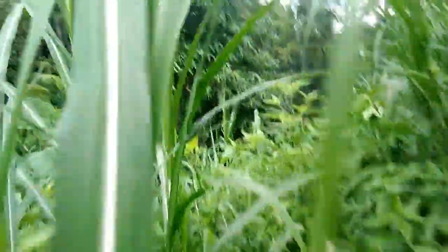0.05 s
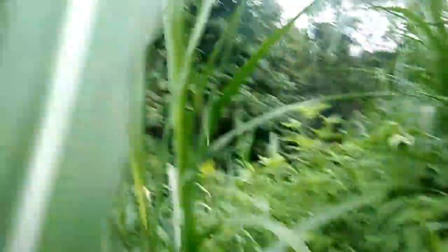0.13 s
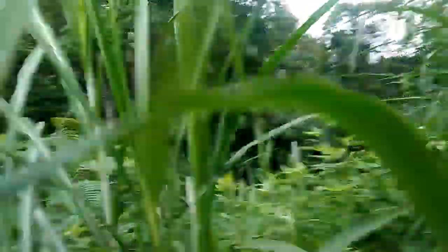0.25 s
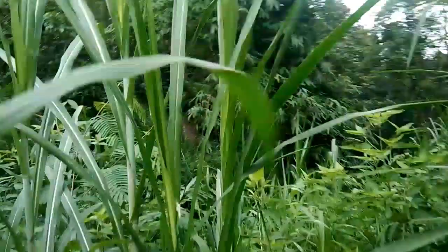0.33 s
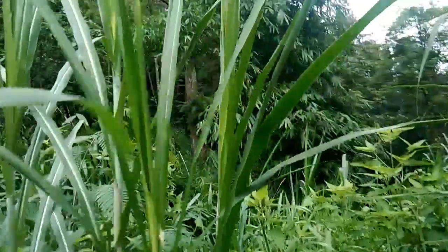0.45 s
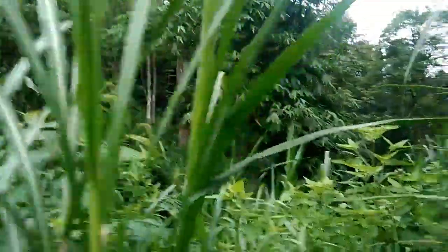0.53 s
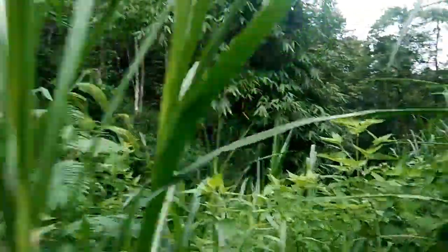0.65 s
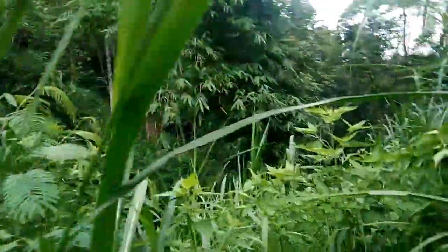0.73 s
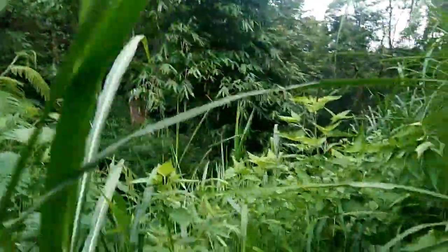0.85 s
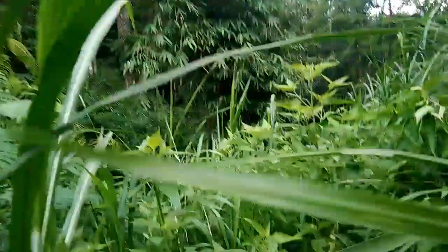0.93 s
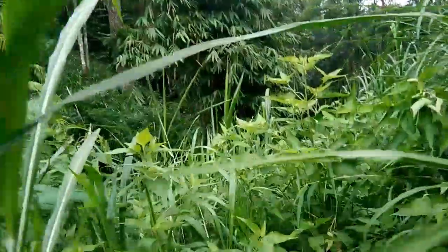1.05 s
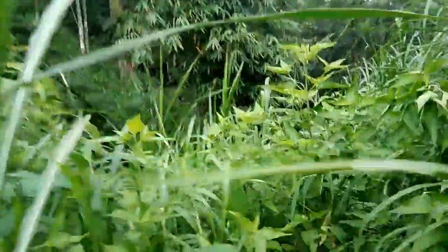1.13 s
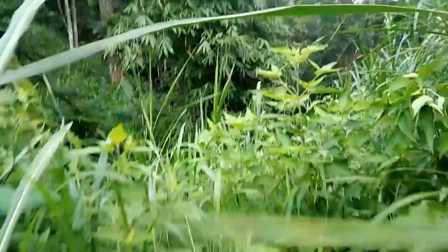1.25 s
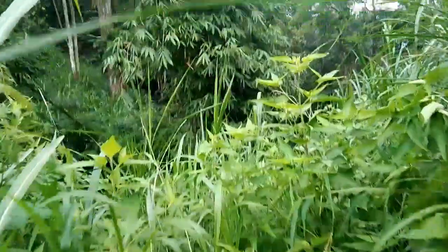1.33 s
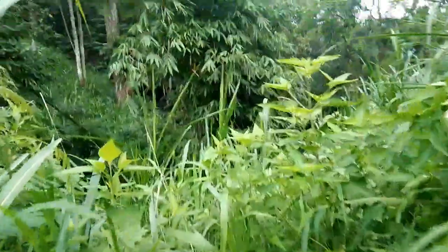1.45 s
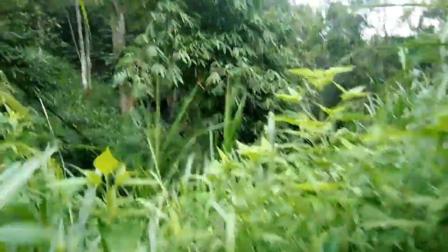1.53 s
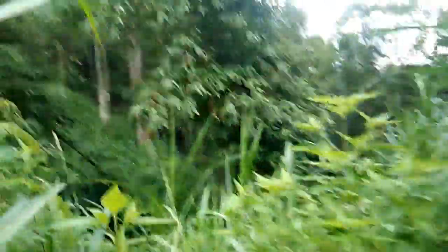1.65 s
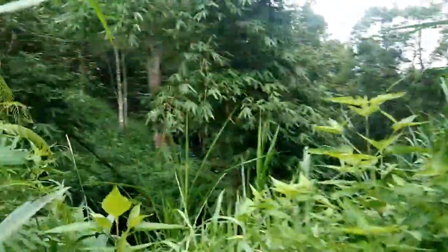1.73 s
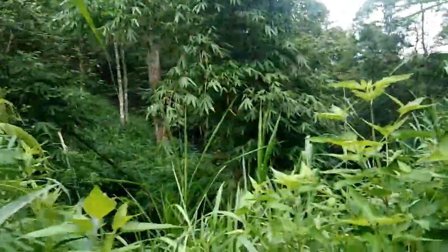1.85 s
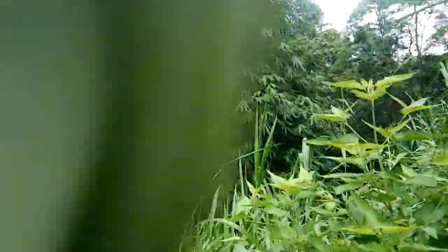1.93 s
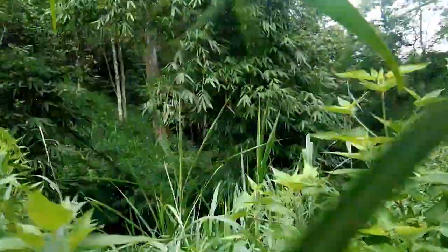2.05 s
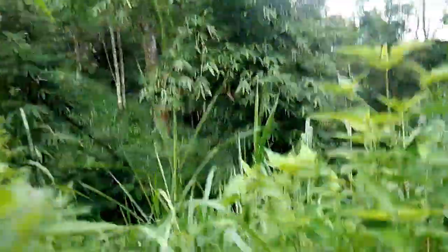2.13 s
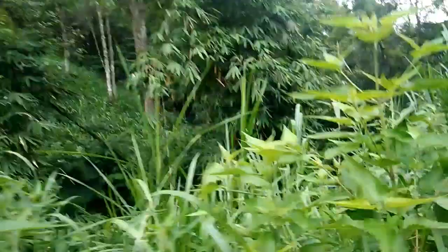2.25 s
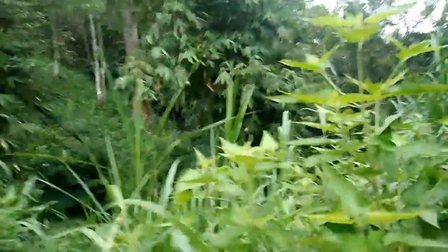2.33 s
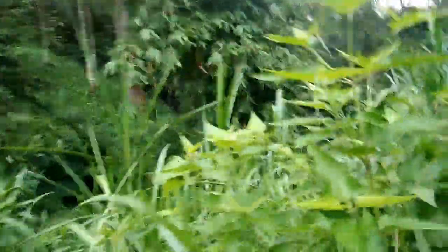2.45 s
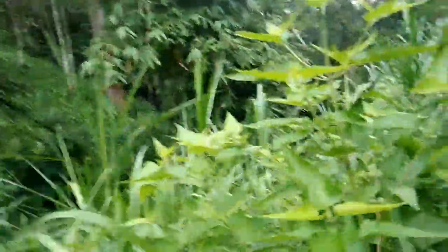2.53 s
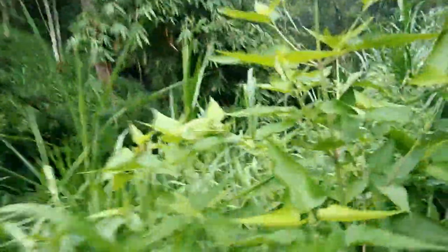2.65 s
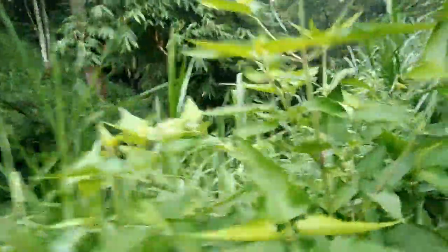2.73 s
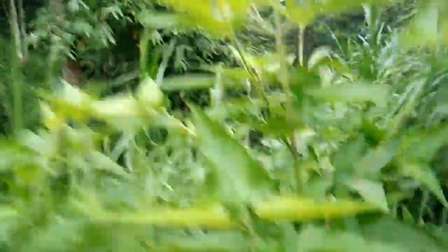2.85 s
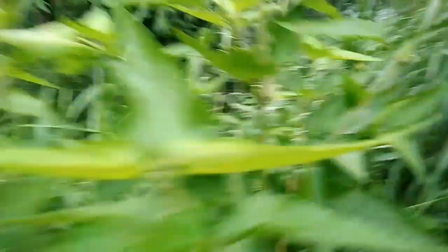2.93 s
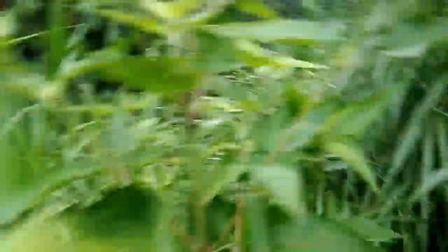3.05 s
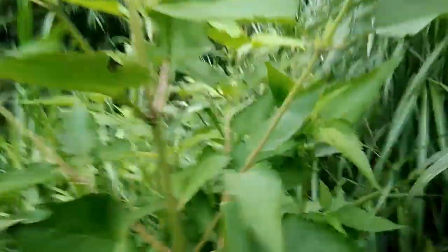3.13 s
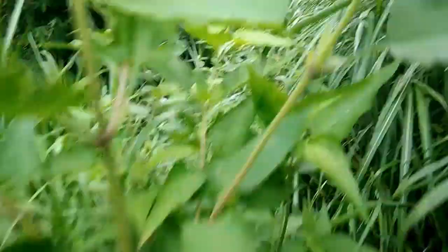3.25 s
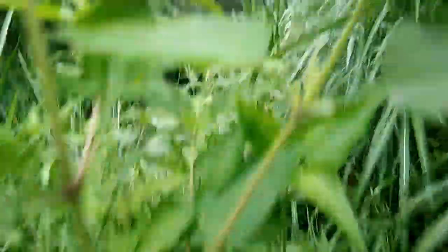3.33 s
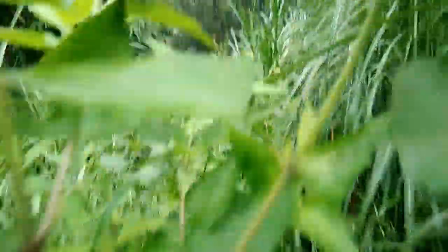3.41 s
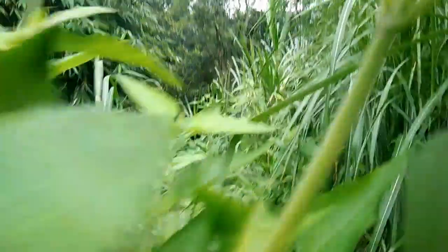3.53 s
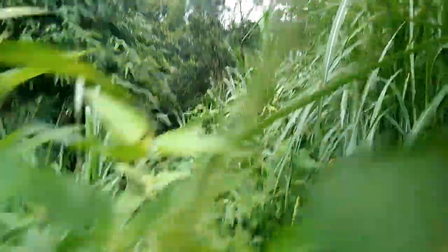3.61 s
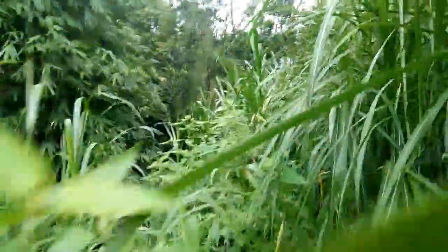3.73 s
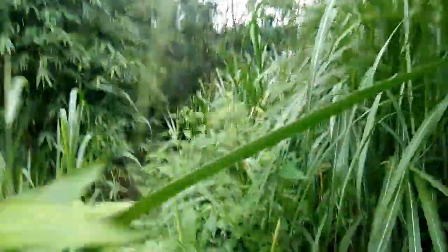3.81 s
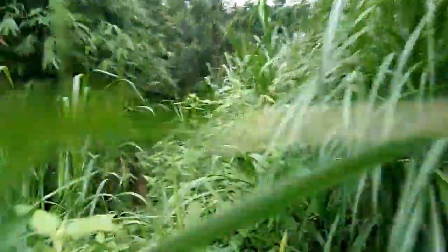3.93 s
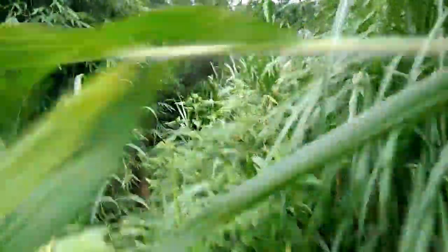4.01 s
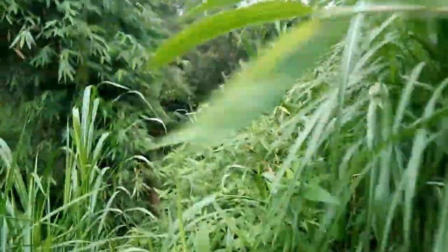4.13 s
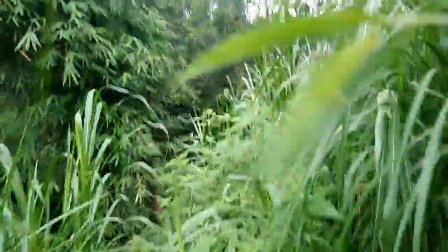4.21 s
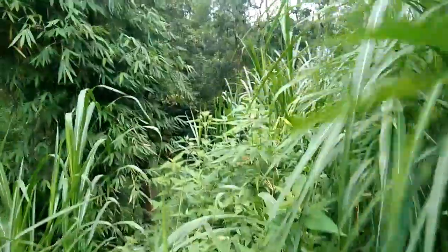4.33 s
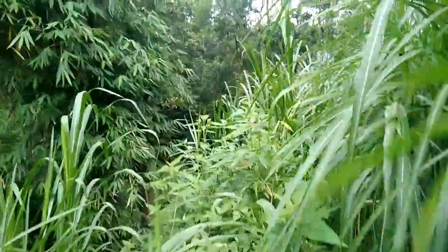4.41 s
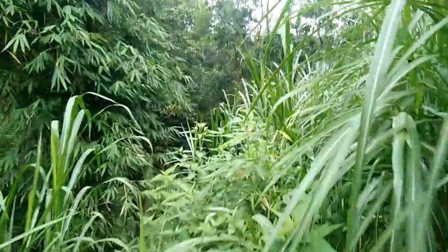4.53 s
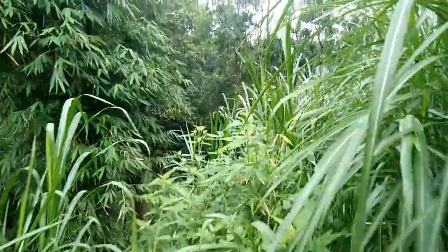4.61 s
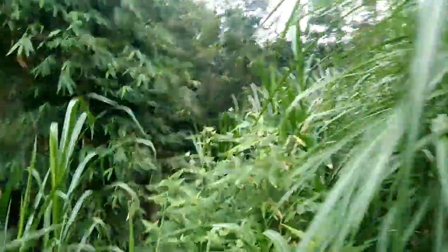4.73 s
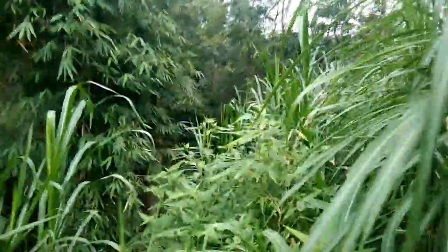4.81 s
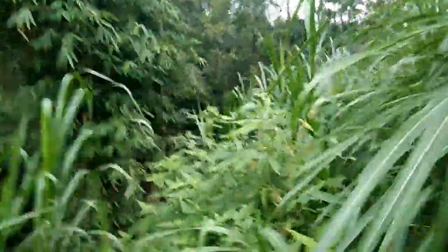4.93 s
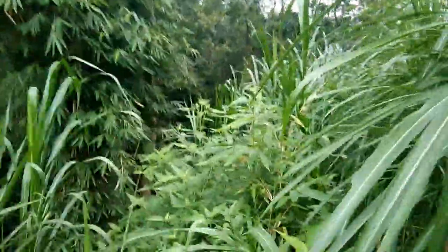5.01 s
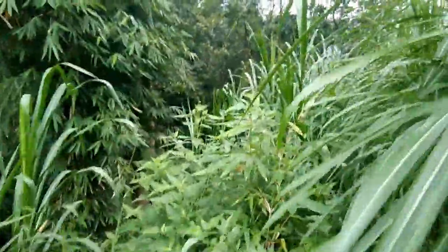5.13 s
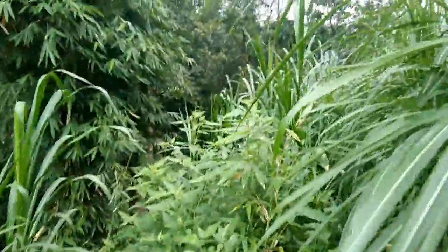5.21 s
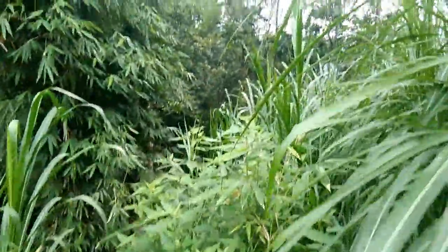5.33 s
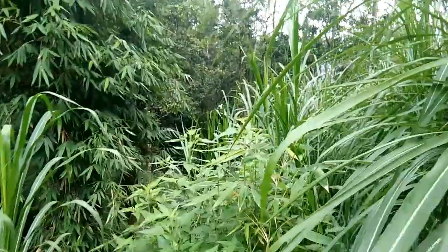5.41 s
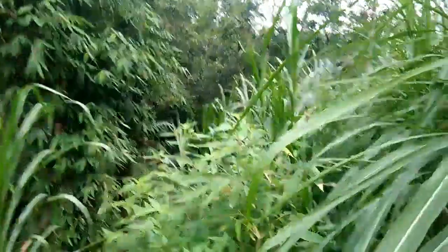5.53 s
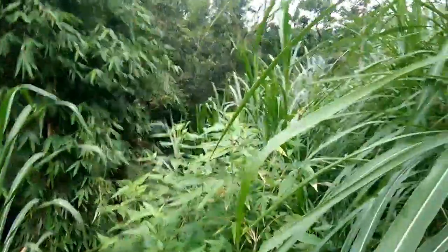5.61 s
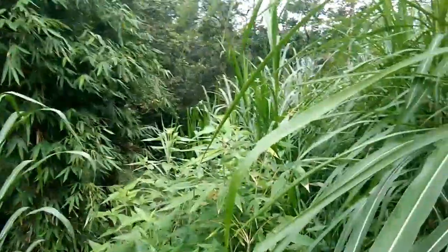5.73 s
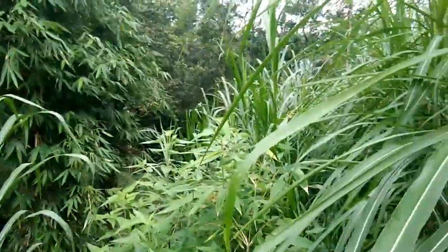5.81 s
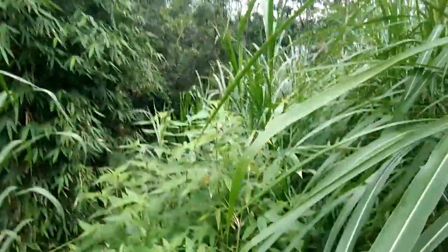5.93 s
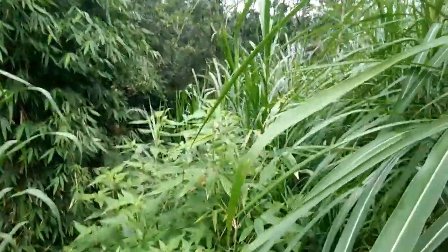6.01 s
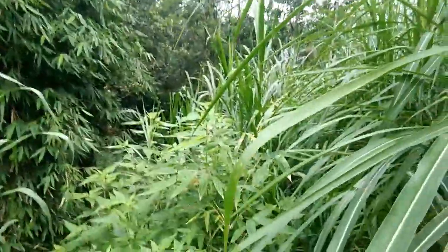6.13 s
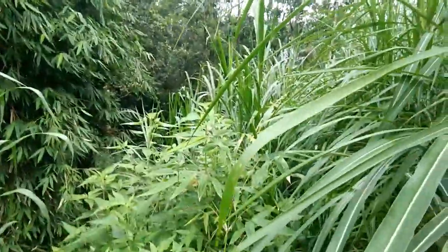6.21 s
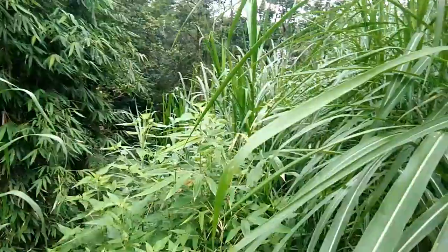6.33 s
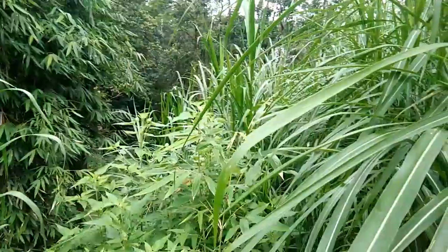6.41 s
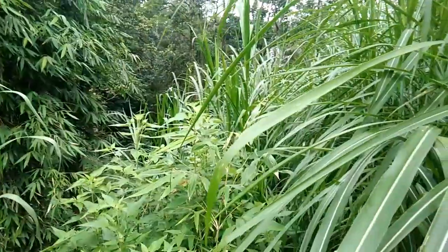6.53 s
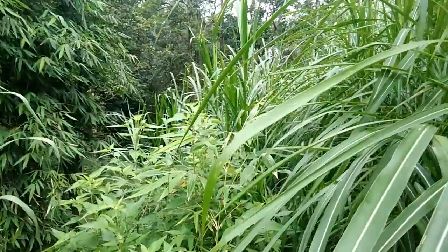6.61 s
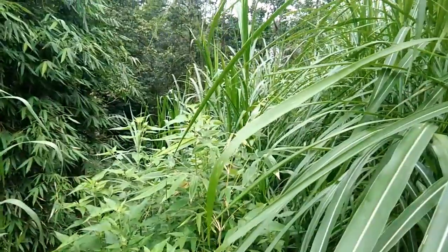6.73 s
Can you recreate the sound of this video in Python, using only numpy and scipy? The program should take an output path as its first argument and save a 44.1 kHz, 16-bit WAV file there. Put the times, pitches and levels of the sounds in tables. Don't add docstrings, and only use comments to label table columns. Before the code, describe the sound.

Tall grass blades slide across a small handheld device with a bright, crackling hiss. Hard snaps and a knot of stalk thumps come almost at once, followed by a tiny creak. Surges of hiss, leaf rustle and low stem swishes continue, then thin out to softer brushing with scattered ticks before fading. Outdoors in dense growth, very close and dry, with a bright microphone and slight handling rumble.

```python
import sys
import numpy as np
from scipy import signal
from scipy.fft import rfft, irfft, next_fast_len
from scipy.io import wavfile
from scipy.ndimage import uniform_filter1d, map_coordinates

SR = 44100
rng = np.random.default_rng(int(sys.argv[2]) if len(sys.argv) > 2 else 0)


def wav_record(signal):
    frames = np.transpose(np.atleast_2d(signal))
    bounded = np.clip(frames, -1, 1)
    quanta = np.round(bounded * 32767).astype(np.int16)
    wavfile.write(sys.argv[1], SR, quanta)


def amplitude_ratio(level_db):
    exponent = np.asarray(level_db, float) / 20
    return 10 ** exponent


N = 298292

# t/s, blade level (speed)/dB, coarseness of the growth/dB
PUSH_COURSE = [(0, -36.5, 1), (.2, -32.5, -1), (.33, -29, 3.5), (.4, -36, 3.5), (.8, -38, 3),
               (1.04, -33.5, 0), (1.34, -36.5, 3), (1.5, -32, 0.5), (1.85, -28.5, -1.5), (2.2, -32.5, 1.5),
               (2.42, -28, -1.5), (2.8, -37, 1.5), (3.1, -38.5, 3), (3.67, -39.5, 1.5), (4.1, -39.5, 2),
               (5.15, -41, 1), (5.9, -41.5, 0.5), (6.76, -44.5, 8)]
# f/Hz, level/dB per Hz
BLADE_SPECTRUM = [(2500, -33.5), (5000, -6.5), (7500, -5.5), (9300, 0), (10600, 2), (11800, -5),
                  (13000, -9.5), (15000, -11), (16000, -18)]
LEAF_SPECTRUM = [(500, -24), (1100, -6), (2000, 0.5), (3500, 0.5), (5500, -2), (8000, -4), (12000, -23.5)]
STEM_SPECTRUM = [(80, -26), (170, -3), (250, -1), (400, 1.5), (800, 0), (1400, -0.5), (2500, -25)]
# f/Hz, level/dB per Hz
HAND_SPECTRUM = [(20, -3), (50, 1), (80, -3), (120, 2), (170, -5), (300, -25.5)]
# f/Hz, level/dB
CRACK_SPECTRUM = [(500, -13.5), (1500, -13), (7000, -1.0), (10500, 2.0), (12500, -4.0), (16000, -11.5)]
RASP_SPECTRUM = [(400, -30.5), (900, -1.5), (2500, -1.5), (4000, -33.5)]
# f/Hz, level/dB
MICROPHONE_RESPONSE = [(15, -20), (55, -4), (90, 0), (15600, 0), (15800, -90)]

# t/s, peak level/dB, blade f/Hz, tone level re crack/dB
BLADE_SNAPS = [(.066, -17, 2220, -1), (0.0727, -15.5, 2650, 1), (0.1352, -5, 2220, -6),
               (0.244, -10.5, 7770, -5), (.2851, -14, 1750, 3), (.3124, -11, 1760, 3),
               (0.3319, -4, 1740, -4), (0.4118, -19.5, 2490, 7), (1.072, -13.5, 2640, -6),
               (1.4306, -16.5, 5420, 5), (2.0747, -16.5, 3200, 9), (2.257, -14, 3580, 3),
               (2.6494, -17, 7000, -1), (2.874, -19.5, 7920, 1), (3.5331, -26, 4370, 8),
               (3.7794, -27, 3620, 8), (3.8058, -19, 5050, -4), (4.0018, -24.5, 3400, 7),
               (4.307, -25, 2480, -6), (4.789, -17, 6900, -13), (5.369, -15.5, 3880, -3.5),
               (5.452, -15.5, 6170, -6), (5.5423, -19, 5050, 5.5), (5.5768, -16, 2770, -3),
               (5.694, -16, 6800, -7), (5.7757, -11, 4860, -19), (5.909, -14, 7200, -17),
               (6.1886, -16.5, 1910, 0), (6.3654, -11, 7150, -15), (6.4495, -21, 2200, 8)]
# t/s, peak level/dB, f/Hz
STALK_THUMPS = [(.235, -28.5, 96), (.277, -23, 1020), (0.3287, -14, 201), (.3285, -19, 600),
                (.338, -6, 279), (.340, -16, 1712), (.341, -23.5, 910), (0.342, -26, 124.5),
                (0.344, -8, 522), (.352, -15, 200), (0.367, -17, 445), (0.368, -15, 1157),
                (0.371, -14.5, 772), (.412, -17.5, 788), (0.415, -21, 1950), (0.416, -17, 1510),
                (.425, -20.5, 1690), (0.441, -26.5, 1546), (.479, -27, 70.4), (.506, -31.5, 810),
                (.61, -34.5, 85), (2.345, -28, 507), (2.59, -27, 443), (3.16, -35, 398),
                (3.227, -30.5, 1420), (3.683, -26, 144), (3.681, -28.5, 460), (4.427, -30, 298),
                (4.683, -30.5, 1300), (6.188, -25.5, 560)]
# t/s, slip f/Hz, level/dB
CREAK_COURSE = [
    (.414, 440, -30.5),
    (.435, 475, -25.5),
    (.455, 512.5, -21.5),
    (.48, 491, -29.5),
    (.5, 433, -32),
    (.515, 319, -38),
    (.54, 224, -34.5),
    (.6, 180, -51),
]
# t/s, lower f/Hz, upper f/Hz, level/dB
CHANNEL_SPLITS = [(.892, 5600, 7000, -45), (.892, 8200, 9800, -46), (1.895, 6240, 7600, -38),
                  (2.195, 5600, 7000, -44), (2.195, 10300, 11800, -39), (2.985, 5600, 7000, -43),
                  (3.102, 4600, 5800, -49), (3.102, 6800, 9000, -46), (3.102, 13700, 15300, -58),
                  (5.26, 6230, 9000, -41)]

# peak t/s, swell level/dB, rise t/s, fall t/s
BLADE_SWEEPS = [(.135, 2, 0.098, 0.037), (.25, 0.5, 0.028, .04), (.34, 3.5, 0.033, .02),
                (1.56, 2, .05, 0.025), (1.79, 2, 0.045, 0.089), (1.94, 2, 0.11, .06),
                (2.43, -0.5, .05, .04), (2.5, 1, .03, 0.076), (2.58, 2, .03, .03), (2.97, 1, 0.12, .05),
                (3.27, 0, 0.18, 0.36), (3.73, 1, 0.028, 0.027), (3.79, 0.5, 0.028, .04),
                (4.18, 2.5, 0.094, 0.045), (4.35, -2, 0.12, 0.12), (4.5, 2.5, 0.027, 0.17),
                (4.82, 4, 0.079, 0.035), (5.23, 4.5, 0.036, 0.18), (5.375, 7.5, 0.12, 0.036),
                (5.54, 7, 0.25, 0.13), (5.7, 3.5, 0.048, 0.03), (5.78, 6, 0.098, .05),
                (5.91, 3.5, .02, .05), (6.04, 3, 0.054, 0.036), (6.2, 8, .03, 0.18), (6.37, 18, .01, .09),
                (6.455, 10.5, .01, .045), (6.5, -8, .02, .02), (6.53, 6, .02, .03)]
# peak t/s, swell level/dB, rise t/s, fall t/s
LEAF_DRAGS = [(.29, 0.5, .03, .03), (.42, -2, .01, 0.056), (.8, -1.5, .2, 0.09), (1.36, 1, .1, 0.063),
              (1.66, 1.5, .08, 0.026), (1.87, 1.5, .08, 0.054), (2.08, 0.5, .08, 0.089),
              (2.32, 1, 0.066, 0.074), (2.74, -1, .06, 0.035), (3.25, 2.5, .12, 0.22), (3.75, 1, .08, .08),
              (4.7, 2, 0.039, 0.11), (5.53, 2.5, 0.07, 0.045), (5.73, 3, 0.059, 0.034),
              (5.87, -1.5, .05, 0.042), (6.31, 2.5, 0.056, 0.036), (6.48, 5, 0.032, 0.018)]
# peak t/s, swell level/dB, rise t/s, fall t/s
STEM_SWISHES = [(.65, 0, 0.057, 0.045), (1.45, -1, .15, 0.12), (1.6, -3, 0.036, .05),
                (2.0, 4.5, 0.072, 0.13), (2.5, -0.5, .15, .12), (2.74, 0.5, .05, 0.042),
                (3.17, 3, 0.066, 0.1), (4.18, 1.5, .05, 0.043), (4.4, 0.5, .15, 0.11), (4.7, 1, 0.073, .08),
                (4.9, -0.5, .08, .1), (5.23, 4, 0.067, 0.057), (5.87, 0, .06, 0.054), (6.38, 4, 0.068, .05)]
# peak t/s, swell level/dB, rise t/s, fall t/s
HAND_JOLTS = [
    (.33, 8.5, .15, .22),
    (.61, 9, .05, .06),
    (.72, 7, 0.05, 0.072),
    (1.69, 3, .04, .1),
    (1.98, 8, 0.086, 0.065),
    (3.2, 1.5, .15, .2),
    (3.69, 6, .05, .08),
    (3.9, 3, 0.09, .06),
    (6.36, 4.5, 0.09, .1),
]

MEDIUM_DB = -36
LEAVES_DB, LEAVES_COARSE, LEAVES_SWEPT = -2, 0.4, 0.6
STEMS_DB, STEMS_SPEED, STEMS_COARSE, STEMS_SWEPT, STEMS_DRAGGED = -45.5, 0.93, 1.3, 0.45, 0.53
HAND_DB, HAND_SPEED, HAND_COARSE, HAND_UNSTEADY_DB = -57, 0.77, 0.9, 0.9
SNAP_T60_S, SNAP_RISE_S = 0.028, 0.00034
CASE_T60_S, BOOM_T60_S, BOOM_HZ = 0.026, 0.045, 85
FADE_S, FADE_DB_PER_S, FADE_BENDS_DB = 5.905, 36.5, 37.5


def unit(x):
    return x / np.sqrt(np.mean(x ** 2) + 1e-20)


def curves(rows):
    s, *cols = np.transpose(rows)
    return [np.interp(np.arange(N) / SR, s, c) for c in cols]


def swells(rows):
    t = np.arange(N) / SR
    total = 0
    for s, db, rise, fall in rows:
        phase = np.clip((t - s) / np.where(t < s, rise, fall), -1, 1)
        total = total + db * np.cos(np.pi / 2 * phase) ** 2
    return total


def wobble(rate):
    knots = rng.standard_normal(int(N * rate / SR) + 4)
    return map_coordinates(knots, [np.arange(N) * rate / SR])


def coloured(x, spectrum):
    m = next_fast_len(N + 8192)
    f, db = np.transpose(spectrum)
    log_f = np.log(np.fft.rfftfreq(m, 1 / SR) + 1)
    gain = amplitude_ratio(np.interp(log_f, np.log(f), db))
    return irfft(rfft(x, m) * gain, m)[:N]


def patchy(patchy_db, wide, long):
    z = signal.stft(rng.standard_normal(N + 512), nperseg=256)[2]
    field = uniform_filter1d(rng.standard_normal(z.shape), wide, 0)
    field = uniform_filter1d(field, long, 1)
    return unit(signal.istft(z * amplitude_ratio(patchy_db * unit(field)), nperseg=256)[1][:N])


def crackle(share, spread_db, t60):
    caught = rng.random(N) < share
    starts = caught * amplitude_ratio(np.minimum(spread_db * rng.exponential(size=N), 11))
    puffs = signal.lfilter([1], [1, -amplitude_ratio(-60 / (t60 * SR))], starts)
    return unit(puffs * rng.standard_normal(N))


def splits():
    out, window = np.zeros(N), signal.windows.hann(2048)
    for s, lo_hz, hi_hz, db in CHANNEL_SPLITS:
        band = [(lo_hz - 60, -90), (lo_hz, 0), (hi_hz, 0), (hi_hz + 60, -90)]
        hiss = unit(coloured(rng.standard_normal(N), band))[:2048]
        out[round(s * SR) - 1024:][:2048] += amplitude_ratio(db) * window * hiss
    return out * [[1], [-1]]


def hand_rumble(speed_db, coarse_db, bumps):
    level_db = HAND_DB + HAND_SPEED * (speed_db - MEDIUM_DB) + HAND_COARSE * coarse_db
    level_db = level_db + swells(HAND_JOLTS) + HAND_UNSTEADY_DB * wobble(7)
    return amplitude_ratio(level_db) * unit(coloured(patchy(1.4, 1, 16) + amplitude_ratio(-2.5) * bumps, HAND_SPECTRUM))


def creak():
    hz, db = curves(CREAK_COURSE)
    phase = 2 * np.pi * np.cumsum(hz * (1 + 0.15 * wobble(400))) / SR
    t = np.arange(N) / SR
    touching = (t > CREAK_COURSE[0][0]) & (t < CREAK_COURSE[-1][0])
    rasp = unit(coloured(rng.standard_normal(N), RASP_SPECTRUM)) * (1 + np.sin(phase))
    slips = np.sin(phase) + 0.24 * np.sin(2 * phase) + amplitude_ratio(-11) * rasp
    return touching * amplitude_ratio(db - 2.5 + 2.5 * wobble(220)) * slips


def thumps():
    out, t = np.zeros(N + SR), np.arange(SR // 8) / SR
    for s, db, hz in STALK_THUMPS:
        t60 = CASE_T60_S + BOOM_T60_S * min(BOOM_HZ / hz, 1) ** 2
        drift = np.cumsum(rng.standard_normal(len(t))) * hz * 0.0002
        out[round(s * SR):][:len(t)] += amplitude_ratio(db - 60 * t / t60) * np.sin(2 * np.pi * hz * t + drift)
    return out[:N]


def snaps():
    crack, tone, t = np.zeros(N + SR), np.zeros(N + SR), np.arange(SR // 8) / SR
    for s, db, hz, tone_db in BLADE_SNAPS:
        start = round(s * SR)
        fall = amplitude_ratio(db - 7.0 - 60 * t / SNAP_T60_S) * (1 - np.exp(-t / SNAP_RISE_S))
        drift = np.cumsum(rng.standard_normal(len(t))) * 0.45
        crack[start:][:len(t)] += fall * rng.standard_normal(len(t))
        ring = amplitude_ratio(tone_db - 30 * t / SNAP_T60_S) * fall
        tone[start:][:len(t)] += ring * np.sin(2 * np.pi * hz * t + drift)
    return coloured(crack[:N], CRACK_SPECTRUM) + tone[:N]


def stems(speed_db, coarse_db, sweep_db, drag_db, bumps, shared):
    level_db = STEMS_DB + STEMS_SPEED * (speed_db - MEDIUM_DB) + STEMS_COARSE * coarse_db
    level_db = level_db + STEMS_SWEPT * sweep_db + STEMS_DRAGGED * drag_db + swells(STEM_SWISHES)
    rub = patchy(1.4, 2, 12) + amplitude_ratio(-10.5) * bumps + amplitude_ratio(-13) * shared
    return amplitude_ratio(level_db) * unit(coloured(rub, STEM_SPECTRUM))


def leaves(speed_db, coarse_db, sweep_db, drag_db, sparse, clumps, shared):
    level_db = speed_db + LEAVES_DB + LEAVES_COARSE * coarse_db + LEAVES_SWEPT * sweep_db + drag_db
    coarse = sparse * amplitude_ratio(-10.5) * crackle(0.01, spread_db=7.0, t60=0.0069)
    rub = patchy(1.02, 5, 10) + coarse + amplitude_ratio(-11.5) * shared
    return amplitude_ratio(level_db) * unit(coloured(rub, LEAF_SPECTRUM) * clumps)


def blades(blades_db, sparse, clumps, shared):
    fine = sparse * amplitude_ratio(-2.5) * crackle(0.037, spread_db=-0.5, t60=0.0096)
    rub = patchy(1.15, 8, 8) + fine + amplitude_ratio(-14.0) * shared
    return amplitude_ratio(blades_db) * unit(coloured(rub, BLADE_SPECTRUM) * clumps)


def grass():
    speed_db, coarse_db = curves(PUSH_COURSE)
    drag_db, sweep_db = swells(LEAF_DRAGS), swells(BLADE_SWEEPS)
    blades_db = speed_db + sweep_db
    clumps = amplitude_ratio(0.42 * wobble(25) + 0.48 * wobble(70))
    sparse = amplitude_ratio(-0.35 * np.clip(blades_db + 33.0, -4, 8))
    shared = sparse * crackle(0.008, spread_db=9.5, t60=0.0076)
    bumps = crackle(0.0022, spread_db=6.0, t60=0.046)
    low = hand_rumble(speed_db, coarse_db, bumps)
    low = low + stems(speed_db, coarse_db, sweep_db, drag_db, bumps, shared)
    middle = leaves(speed_db, coarse_db, sweep_db, drag_db, sparse, clumps, shared)
    return low + middle + blades(blades_db, sparse, clumps, shared)


def scene():
    return np.tile(creak() + thumps() + snaps() + grass(), (2, 1))


def roll_off(x):
    return signal.sosfilt(signal.butter(12, 15740, fs=SR, output="sos"), x)


def record(dry):
    late = np.maximum(np.arange(N) / SR - FADE_S, 0)
    fade = amplitude_ratio(-FADE_DB_PER_S * late - FADE_BENDS_DB * late ** 2)
    heard = np.array([coloured(fade * x, MICROPHONE_RESPONSE) for x in dry])
    return roll_off(heard + splits())


dry = scene()
out = record(dry)
wav_record(out)
```